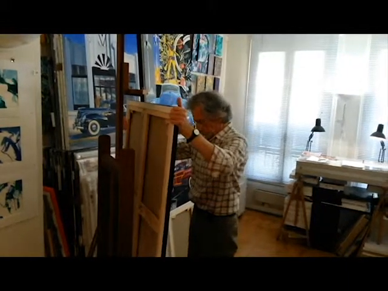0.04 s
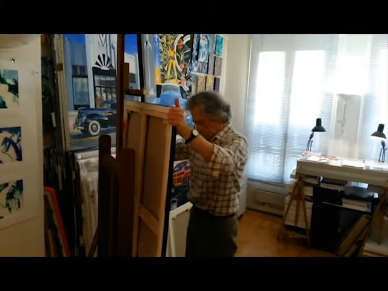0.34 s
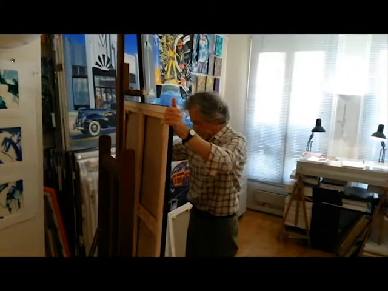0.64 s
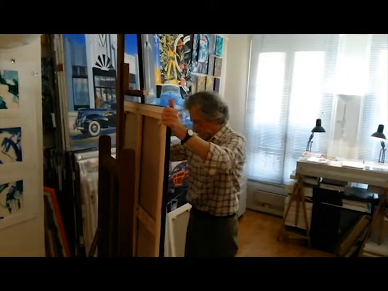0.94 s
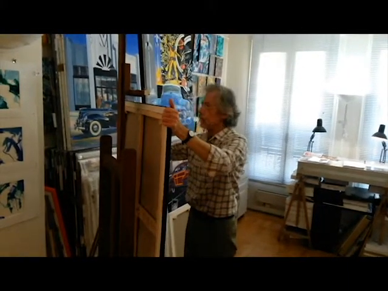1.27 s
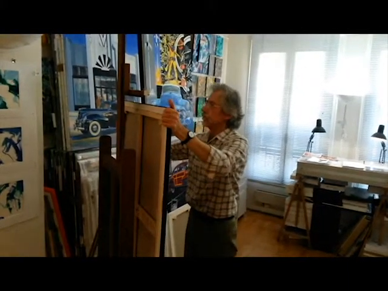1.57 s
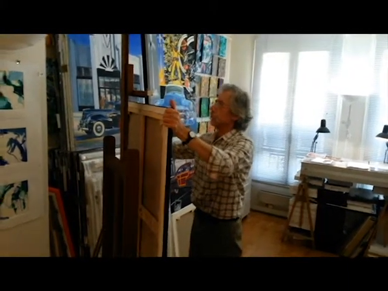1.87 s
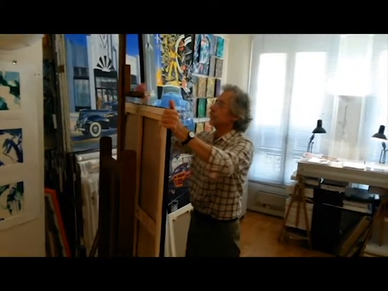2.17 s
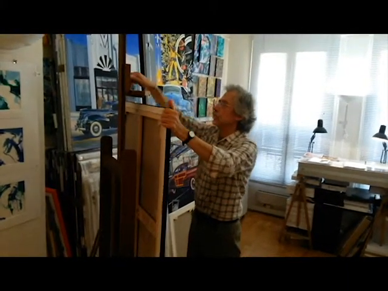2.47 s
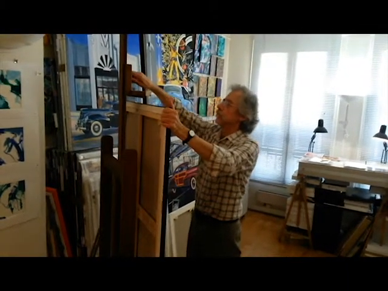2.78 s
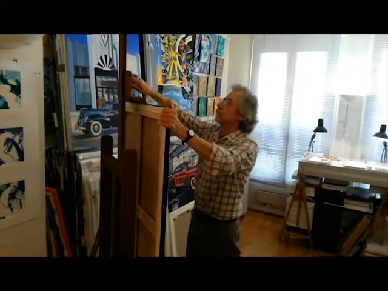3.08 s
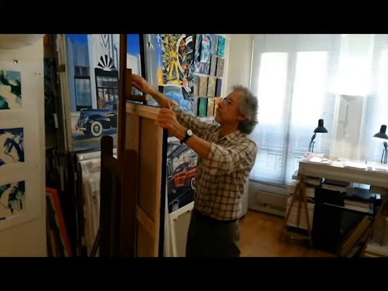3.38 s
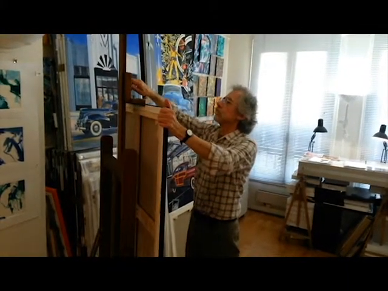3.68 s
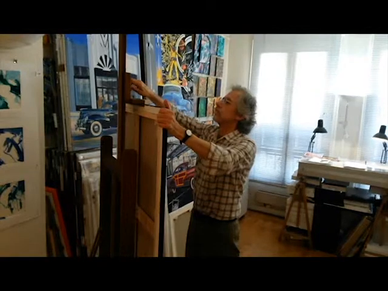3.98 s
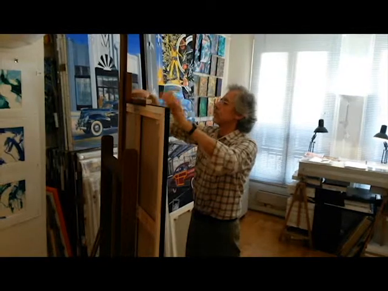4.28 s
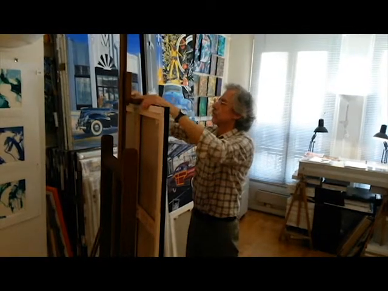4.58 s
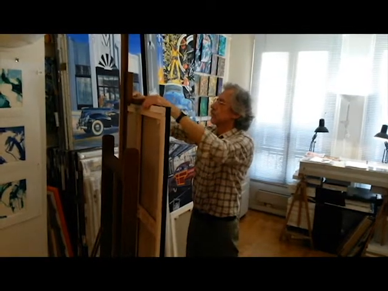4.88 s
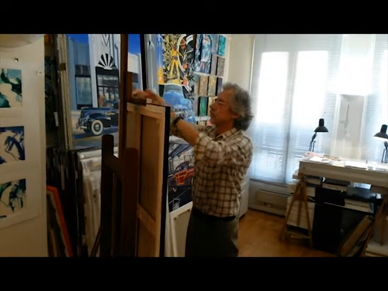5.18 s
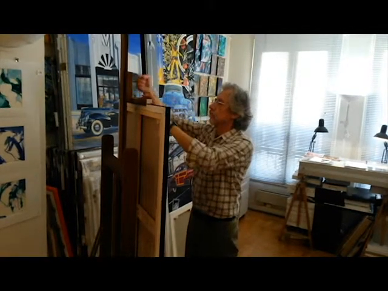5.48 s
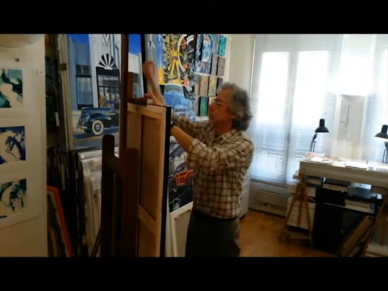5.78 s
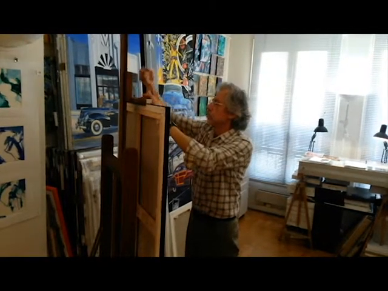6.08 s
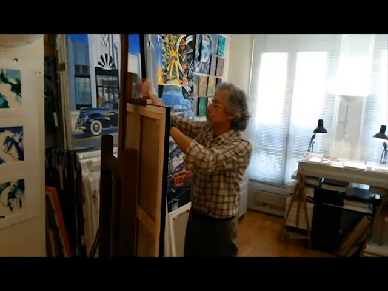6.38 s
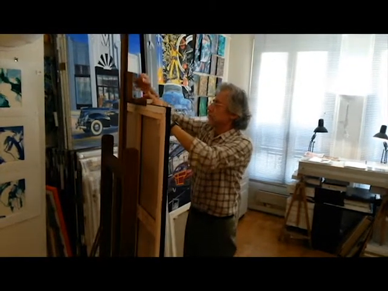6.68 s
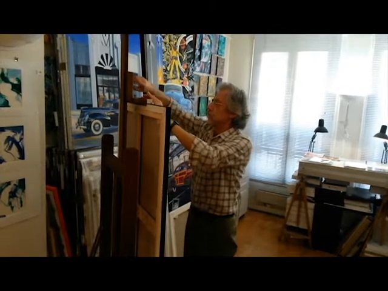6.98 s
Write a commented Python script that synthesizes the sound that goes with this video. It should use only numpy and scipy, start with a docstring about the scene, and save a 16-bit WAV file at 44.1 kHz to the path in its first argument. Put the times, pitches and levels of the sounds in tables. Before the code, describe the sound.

Light, uneven wooden knocks and little clinks of loose hardware come first, as a canvas is shifted on an easel with faint rubbing. A brief metallic snap follows, then a quieter stretch of brushing and taps. Near the end the clamp is struck three times, loudly, the wood clattering and the canvas thumping like a slack drum. It is heard in stereo in a small room, over faint hiss and far traffic.

```python
"""Light wooden taps, rubs and a small metal rattle: a framed canvas is being settled on a studio easel.
Wood drags and squeaks on wood, a sleeve brushes the weave, and the top clamp snaps loose.
Then three loud blows drive the clamp down the mast: each time it is struck, slips and seats on the
frame, the easel kicks back and the canvas booms like a slack drum. The room answers at two
microphones a hand's length apart, over faint hiss and the low drone of far traffic."""
import sys
import numpy as np
from scipy import signal
from scipy.fft import rfft, irfft, next_fast_len
from scipy.io import wavfile
from scipy.ndimage import map_coordinates

SR = 44100
rng = np.random.default_rng(int(sys.argv[2]) if len(sys.argv) > 2 else 0)


def unload_audio(sound):
    """Save the sound as a 16-bit wav file, at the path given as the first command line argument."""
    columns = np.transpose(np.atleast_2d(sound))
    # keep every value between -1 and 1, then stretch to whole-number steps
    steps = np.round(np.clip(columns, -1, 1) * 32767)
    wavfile.write(sys.argv[1], SR, steps.astype(np.int16))


N = 310717
TIME = np.arange(N) / SR
AGE = np.arange(int(.6 * SR)) / SR  # seconds into a single hit
HIT_HZ = np.fft.rfftfreq(len(AGE), 1 / SR)

# Blows on the clamp: t/s, level/dB, thud/dB and click/dB re mids, slip/s, seating/dB re strike
CLAMP_BLOWS = [(5.952, 3, -7.5, -11, 0.028, 7.5), (6.265, 11.5, -9, -7, 0.03, -3.5),
               (6.483, 9, -4.5, -12.5, .025, -3)]
# Tone of hard-hit wood: f/Hz, level/dB
BLOW_EQ = [(16, -39), (28, -10), (134, -7.5), (210, -7), (252, -15), (354, -8), (393, -10.5), (472, -5.5),
           (717, -3), (884, -4.5), (1490, -4.5), (3530, -24), (5810, -29.5), (7540, -25), (14500, -66)]
TOUCH_LEAD_S = .008  # the hand lands just ahead of the strike
def clamp_blows(strike_hz=1570, seat_hz=764, kick_s=.044, kick_db=-8.5):
    """The hand lands and strikes; the clamp slips down and seats on the frame; the easel kicks back."""
    out = np.zeros((2, N))
    hand_rise_s, wood_rise_s = .062, .012  # a soft hand builds slowly, wood on wood fast
    for s, db, thud_db, click_db, slip_s, seat_db in CLAMP_BLOWS:
        # t/s, level/dB, thud/dB, click/dB, focus/Hz, rise/s
        touch = (s - TOUCH_LEAD_S, db - 6, thud_db, -3, seat_hz, hand_rise_s)
        strike = (s, db, thud_db, click_db, strike_hz, wood_rise_s)
        seat = (s + slip_s, db + seat_db, -9.5, -12, seat_hz, wood_rise_s)
        kick = (s + slip_s + kick_s, db + seat_db + kick_db, -9.5, -12, seat_hz, wood_rise_s)
        for at, level_db, low_db, high_db, hz, rise_s in [touch, strike, seat, kick]:
            wood = knock(BLOW_EQ, low_db, high_db, hz, rise_s,
                         focus_db=.5, chatter_s=.079, ring_db=-12.5, crack_db=-38.5)
            add(out, at, amp(level_db) * in_room(wood, direct_db=-7.5))
    return out

def clamp_cracks(crack_db=-29):
    """The clamp breaks free of the mast with a short, dry crack as the hand lands."""
    out = np.zeros((2, N))
    for s, db, *_ in CLAMP_BLOWS:
        crack = burst(chatter_s=.05, rise_s=.03)
        add(out, s - TOUCH_LEAD_S, amp(db + crack_db) * in_room(crack, direct_db=2))
    return out

# Modes of the stretched cloth: f/Hz, level/dB, t60/s
CANVAS_MODES = [(64, -3, .36), (140, 0, .32), (172, -1, .26), (205, 3, .34)]
def canvas_boom(rise_s=.048, boom_db=-2.5):
    """Each blow sets the stretched cloth booming like a slack drum, just under the thud."""
    out = np.zeros((2, N))
    for s, db, thud_db, *_ in CLAMP_BLOWS:
        boom = ring(CANVAS_MODES, scatter_db=3) * (1 - fade(rise_s))
        add(out, s, amp(db + thud_db + boom_db) * boom[None])
    return out

# Frame meeting easel: t/s, level/dB, thud/dB and click/dB re mids, focus/Hz
FRAME_TAPS = [(0.206, -14.5, -4.5, -7.5, 705), (0.282, -26.5, 1.5, -2.5, 480), (0.529, -33.5, 3, -0.5, 830),
              (0.6, -38.5, 8.5, -14, 430), (0.64, -31.5, -6, -15, 680), (0.702, -35.5, 2.5, -19, 1520),
              (0.762, -32.5, 1.5, -23, 480), (0.995, -39.5, 0, -23, 800), (1.07, -17.5, -2.5, -11.5, 680),
              (1.129, -23.5, 1.5, -9, 680), (1.402, -39.5, -9, 8.5, 780), (1.934, -37.5, 10.5, -2.5, 500),
              (2.056, -15.5, -9.5, -9.5, 630), (2.198, -25.5, 1.5, -4, 606),
              (2.554, -14.5, -21, -11.5, 1170), (2.659, -32.5, 3, -20, 1500), (2.769, -28, 4.5, -2, 706),
              (3.106, -35, 5, -24, 790), (3.506, -34, -3.5, -14, 620), (3.602, -41, -14, -26, 750),
              (3.762, -29, -2, -4.5, 1510), (4.267, -35.5, 1, -6.5, 586), (4.85, -45.5, -10, -20, 750),
              (4.91, -31, -5, -15, 630), (4.935, -28, -6.5, -14, 560), (5.07, -47, -9, -20, 750),
              (5.668, -38.5, 9.5, -11, 557)]
# Tone of lightly tapped wood: f/Hz, level/dB
TAP_EQ = [(16, -50), (28, 1.5), (140, -1), (205, 1.5), (290, -11.5), (345, -3), (414, -9), (472, -1),
          (510, -6.5), (680, -4), (884, -7.5), (1180, -7), (1890, -15.5), (5660, -30), (7540, -23),
          (14500, -59)]
def frame_taps(firm_db=-14.5, firm_rise_s=.0097, db_per_doubling=12.5):
    """The frame grazes the easel, lands and rocks back; the gentler the tap, the slower its attack."""
    out = np.zeros((2, N))
    for s, db, thud_db, click_db, hz in FRAME_TAPS:
        rise_s = firm_rise_s * 2 ** ((firm_db - db) / db_per_doubling)
        graze, land, rock = (-.009, -11, thud_db), (0, 0, thud_db), (.07, -20.5, 5)
        for delay_s, trim_db, low_db in [graze, land, rock]:
            wood = knock(TAP_EQ, low_db, click_db, hz, rise_s,
                         focus_db=4, chatter_s=.044, ring_db=-20, crack_db=-4.5)
            add(out, s + delay_s, amp(db + trim_db) * in_room(wood, direct_db=-4.5))
    return out

# Modes of the easel's wood: f/Hz, level/dB, t60/s
EASEL_MODES = [(133, -2, .11), (202, -4, .28), (350, -1, .2), (485, 5, .27), (607, 5, .27), (732, 5, .24),
               (825, 6, .18), (991, 2, .22), (1093, 1, .18), (1269, -3, .14), (1510, 3, .18),
               (1700, -4, .13), (3070, 4, .06)]
def knock(eq, thud_db, click_db, focus_hz, rise_s, focus_db, chatter_s, ring_db, crack_db):
    """One wood contact: a crack, chatter coloured by the frame, a low thud and ringing modes."""
    # the point of contact favours one region of the frame's resonances
    focus = np.exp(-(np.log2((HIT_HZ + 1) / focus_hz) / .58) ** 2)
    colour_db = along(eq, HIT_HZ) + focus_db * focus
    low = 1 / (1 + (HIT_HZ / 270) ** 6)
    high = 1 - 1 / (1 + (HIT_HZ / 3300) ** 6)
    # thud, mids and click start at equal power, then each gets its own fader
    bands = np.array([low, np.abs(1 - low - high), high]) * amp(colour_db) ** 2
    bands /= np.mean(bands, axis=1, keepdims=True)
    gain = np.sqrt(amp([thud_db, 0, click_db]) ** 2 @ bands)
    body = irfft(rfft(burst(chatter_s, rise_s)) * causal(gain))
    modes = ring(EASEL_MODES, scatter_db=11.5) * (1 - fade(rise_s))
    crack = burst(chatter_s=.011, rise_s=.005)
    return body + amp(ring_db) * modes + amp(click_db + crack_db) * crack

# The clamp letting go: t/s, level/dB
CLAMP_SNAPS = [(3.7602, -19)]
# Resonances of its catch: f/Hz, level/dB
CATCH_EQ = [(900, -37), (1250, -7), (2000, -24), (2550, -10.5), (2760, 0), (3150, -6), (3600, -17),
            (4300, -3), (5000, -5.5), (5500, -11), (6400, -10.5), (7800, -17), (10000, -30), (14500, -49.5)]
def clamp_snap():
    """The clamp creeps for a moment, then gives with a short, rough metallic snap."""
    out = np.zeros((2, N))
    catch = causal(amp(along(CATCH_EQ, HIT_HZ)))
    for s, db in CLAMP_SNAPS:
        for lead_s, trim_db in [(.012, -16), (.00095, 2.5)]:
            chatter = burst(chatter_s=.016, rise_s=.004)
            snap = packet(irfft(rfft(chatter) * catch))
            add(out, s - lead_s, amp(db + trim_db) * in_room(snap, direct_db=-8))
    return out

# Rattles of the clamp's hardware: t/s, level/dB, first flight/s
METAL_RATTLES = [(0.207, -28.5, .076), (0.704, -43, 0.041), (1.084, -28.5, .048), (1.927, -43, 0.046),
                 (2.497, -49.5, 0.064), (2.568, -33.5, 0.086), (2.799, -42, 0.038), (3.986, -52, .04),
                 (4.091, -47, 0.027)]
# Modes of that metal: f/Hz, level/dB, t60/s
METAL_MODES = [(1505, -7, 0.069), (2820, -7, 0.07), (4300, -24, 0.063), (4370, -1.5, 0.061),
               (4640, 3.5, 0.054), (5300, -10, 0.071), (6060, -13, 0.07), (6300, -16, 0.038),
               (6500, -6, 0.055), (7700, -25, 0.07), (7700, -19.5, 0.1), (8780, -13, 0.099)]
def metal_rattle(landings=4, flight_shrink=.82, loss_db=7.5, bounce_s=.024, bounce_db=-6):
    """The loose metal hops in ever shorter, weaker flights and clinks twice at each landing."""
    out = np.zeros((2, N))
    for s, db, flight_s in METAL_RATTLES:
        for k in range(landings):
            for delay_s, trim_db in [(0, 0), (bounce_s * rng.uniform(.84, 1.6), bounce_db)]:
                clink = ring(METAL_MODES, scatter_db=2.5) * (1 - fade(.003))
                add(out, s + delay_s, amp(db - k * loss_db + trim_db) * in_room(clink, direct_db=9.5))
            s += flight_s * flight_shrink ** k
    return out

# Wood squeaking on wood: t/s, level/dB, f/Hz
JOINT_SQUEAKS = [(1.433, -40.5, 754), (1.542, -40, 720)]
def joint_squeaks(length_s=.015, sag=.08, rough=.14):
    """A dry joint slips: a short, uneven tone that sags in pitch."""
    out = np.zeros((2, N))
    slip = np.minimum(AGE / length_s, 1)
    for s, db, hz in JOINT_SQUEAKS:
        pitch = hz * (1 + sag * (.5 - slip) + rough * wobble(940)[:len(AGE)])
        tone = np.sin(np.pi * slip) * np.sin(2 * np.pi * np.cumsum(pitch) / SR)
        add(out, s, amp(db) * in_room(packet(tone), direct_db=4))
    return out

# Pushes of the frame along the ledge: peak t/s, run-up/s, level/dB
FRAME_DRAGS = [(.35, 0.32, -61), (.76, 0.26, -66.5), (1.21, 0.17, -63), (1.95, 1, -73.5),
               (2.68, 0.13, -64.5), (4.1, .2, -76), (5.8, 0.12, -72)]
# Tone of the scraped ledge: f/Hz, level/dB
LEDGE_EQ = [(250, -11.5), (500, -9), (800, -10.5), (1000, -9.5), (1250, -3), (1520, -2.5), (1900, -13.5),
            (3000, -15), (4100, -10), (6000, -19), (12000, -25)]
def frame_drags(slips_per_s=260):
    """Wood drags on wood in tiny slips of uneven size and timing."""
    slips = (rng.random(N) < slips_per_s / SR) * rng.standard_normal(N)
    grain = diffuse(len(AGE)) * fade(.069)
    scrape = signal.fftconvolve(slips[None], grain, axes=1)[:, :N]
    return strokes(FRAME_DRAGS, release_s=.1) * coloured(scrape, LEDGE_EQ)

# Strokes of hand and sleeve over the canvas: peak t/s, run-up/s, level/dB
CANVAS_RUBS = [(.2, 0.089, -58.5), (.78, .25, -72), (1.15, .09, -59.5), (1.85, .3, -75.5),
               (2.11, 0.088, -58.5), (2.79, 0.05, -64.5), (3.12, 0.15, -74.5), (4.205, 0.024, -64.5),
               (4.5, 0.022, -61.5), (4.63, 0.091, -57), (4.96, 0.048, -68.5), (5.29, 0.35, -74),
               (5.8, 0.13, -73), (6.88, 0.3, -72)]
# Tone of the brushed weave: f/Hz, level/dB
WEAVE_EQ = [(300, -14), (600, -12.5), (1200, -13), (2500, -11), (5800, -8), (7000, -5), (7800, -3),
            (9000, -11), (14500, -19)]
def canvas_rubs(sleeve_db=-78.5):
    """Skin and cloth hiss over the weave, catching unevenly; the sleeve never keeps quite still."""
    hiss = coloured(diffuse(N), WEAVE_EQ)
    catching = amp(.8 * wobble(60))
    return hiss * catching * np.hypot(strokes(CANVAS_RUBS, release_s=.082), amp(sleeve_db))

# Tone of the quiet room: f/Hz, level/dB
ROOM_TONE_EQ = [(25, -10.5), (50, -2), (90, 3), (150, -9), (200, -6), (300, -15.5), (600, -20.5),
                (1500, -22.5), (5800, -28), (7500, -25), (9500, -25.5), (14500, -23.5)]
# Drone of far traffic: t/s, f/Hz, level/dB
TRAFFIC_DRONE = [(0, 82, -65.5), (.9, 85, -68.5), (1.8, 87, -72.5), (3.2, 90, -78), (4.1, 106, -79.5),
                 (4.6, 126, -69.5), (5.3, 122, -72.5), (5.8, 120, -71.5), (7.05, 121, -72)]
def room_tone_and_traffic(room_db=-69.5):
    """The bed: steady room rumble and hiss, and the wavering drone of far traffic."""
    room_tone = coloured(diffuse(N), ROOM_TONE_EQ)
    s, hz, db = np.transpose(TRAFFIC_DRONE)
    pitch_hz = np.interp(TIME, s, hz) * (1 + .04 * wobble(25))
    level_db = np.interp(TIME, s, db) + 1.5 * wobble(28)
    drone = np.sqrt(2) * np.sin(2 * np.pi * np.cumsum(pitch_hz) / SR)
    return amp(room_db) * room_tone + amp(level_db) * drone

# Reverb of the studio: f/Hz, t60/s
STUDIO_DECAY = [(60, 0.49), (200, 0.47), (450, 0.36), (700, 0.33), (2000, 0.36), (5000, 0.39), (8000, 0.44),
                (14000, 0.21)]
def in_room(x, direct_db, lag_s=.00013, build_s=.0017):
    """The direct sound reaches the right microphone first; the room's tail builds up and dies away."""
    hz, t, noise = signal.stft(diffuse(len(AGE)), SR, nperseg=256)
    decay = fade(along(STUDIO_DECAY, hz)[:, None], t)
    tail = signal.istft(noise * decay, SR, nperseg=256)[1][:, :len(AGE)]
    tail = packet(tail * (1 - np.exp(-AGE / build_s)))
    direct = filtered(x, lambda hz: np.exp(1j * np.pi * hz * lag_s * np.array([[-1], [1]])))
    return amp(direct_db) * direct + signal.fftconvolve(x[None], tail, axes=1)[:, :len(AGE)]

def diffuse(n, spacing_m=.15):
    """Noise from all directions: alike at both microphones only for long waves."""
    alike = lambda hz: np.sinc(2 * hz * spacing_m / 343)
    noise = rng.standard_normal((2, n))
    mid, side = filtered(noise, lambda hz: np.sqrt([1 + alike(hz), 1 - alike(hz)]))
    return unit(np.array([mid + side, mid - side]))

def burst(chatter_s, rise_s):
    """Surfaces meet in a dense run of tiny impacts that swells and dies, with a flat spectrum."""
    swell = 1 - fade(rise_s)
    run = rfft(rng.standard_normal(len(AGE)) * fade(chatter_s) * swell)
    whitened = irfft(run / np.abs(run))
    return packet(whitened * fade(chatter_s * 4) * swell)

def ring(modes, scatter_db):
    """Modes ring with new strengths at every contact."""
    hz, db, t60 = np.transpose(modes)[:, :, None]
    strength = amp(db + scatter_db * rng.standard_normal(hz.shape)) * rng.choice([-1, 1], hz.shape)
    return packet(np.sum(strength * np.sin(2 * np.pi * hz * AGE) * fade(t60), axis=0))

def strokes(rows, release_s):
    """Envelope of sliding moves: each gathers speed over its run-up and slows to rest."""
    power = np.zeros(N)
    for s, run_up_s, db in rows:
        width_s = np.where(TIME < s, run_up_s, release_s)
        power += (amp(db) * np.exp(-((TIME - s) / width_s) ** 2)) ** 2
    return np.sqrt(power)

def amp(db):
    """Decibels to gain."""
    return 10 ** (np.asarray(db) / 20)

def unit(x):
    """Scale to rms 1."""
    return x / np.sqrt(np.mean(x ** 2) + 1e-20)

def packet(x):
    """Scale to energy 1 per channel, so a hit's level sets its energy."""
    return unit(x) / np.sqrt(x.shape[-1])

def along(points, hz):
    """Read a curve of (f/Hz, value) points on a log axis."""
    f, value = np.transpose(points)
    return np.interp(np.log(hz + 1), np.log(f + 1), value)

def wobble(rate):
    """A smooth random curve, rate knots a second."""
    return map_coordinates(rng.standard_normal(int(N * rate / SR) + 4), [TIME * rate])

def fade(t60, t=AGE):
    """Exponential decay by 60 dB in t60 seconds."""
    return np.exp(-np.log(1000) * t / np.maximum(t60, 1e-4))

def filtered(x, response):
    """Pass x through a frequency response."""
    n = x.shape[-1]
    padded = next_fast_len(n + 8192)
    return irfft(rfft(x, padded) * response(np.fft.rfftfreq(padded, 1 / SR)), padded)[..., :n]

def coloured(x, eq):
    """Shape x with an EQ curve and bring it to rms 1."""
    return unit(filtered(x, lambda hz: amp(along(eq, hz))))

def causal(gain):
    """The minimum-phase response with this gain: nothing sounds before the contact."""
    cepstrum = irfft(np.log(np.maximum(gain, 1e-6)))
    half = len(cepstrum) // 2
    cepstrum[1:half] *= 2
    cepstrum[half + 1:] = 0
    return np.exp(rfft(cepstrum))

def add(track, s, sound):
    """Mix a sound into the track at s seconds."""
    part = track[:, round(s * SR):][:, :sound.shape[-1]]
    part += sound[:, :part.shape[-1]]

def scene():
    """The mix: blows up front, small contacts and friction beneath, the bed at the back."""
    blows = clamp_blows() + clamp_cracks() + canvas_boom()
    contacts = frame_taps() + metal_rattle() + clamp_snap()
    friction = joint_squeaks() + frame_drags() + canvas_rubs()
    return blows + contacts + friction + room_tone_and_traffic()

# Balance of the microphones: f/Hz, left minus right/dB
MIC_BALANCE = [(100, 2), (350, -2.5), (1200, 0.4), (3500, 0), (6500, 1.5), (9000, -4), (14000, 0.5)]
LOW_CUT_HZ, HIGH_CUT_HZ = 33, 14600
def record(dry):
    """Each microphone has a slightly different tone; the deepest bass and the top air are cut."""
    pair = filtered(dry, lambda hz: amp(along(MIC_BALANCE, hz) * np.array([[.5], [-.5]])))
    pair = signal.sosfilt(signal.butter(10, LOW_CUT_HZ, "highpass", fs=SR, output="sos"), pair)
    return filtered(pair, lambda hz: hz < HIGH_CUT_HZ)

dry = scene()
out = record(dry)
unload_audio(out)
```